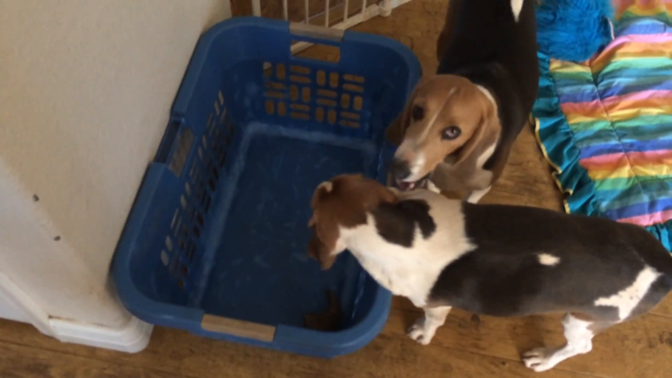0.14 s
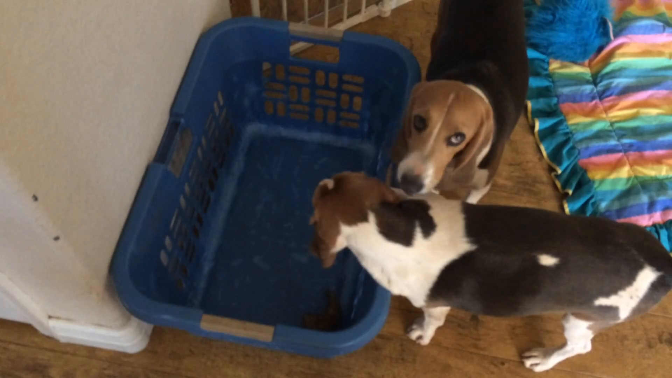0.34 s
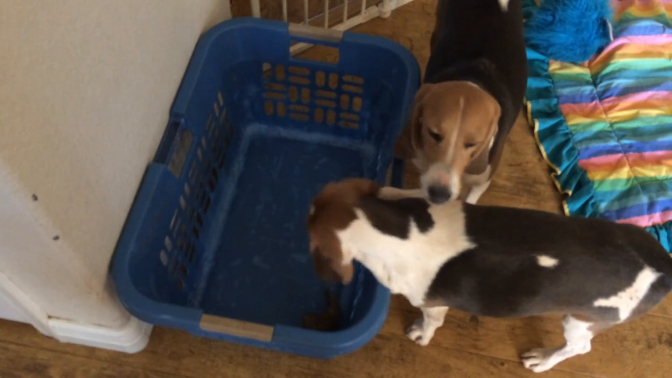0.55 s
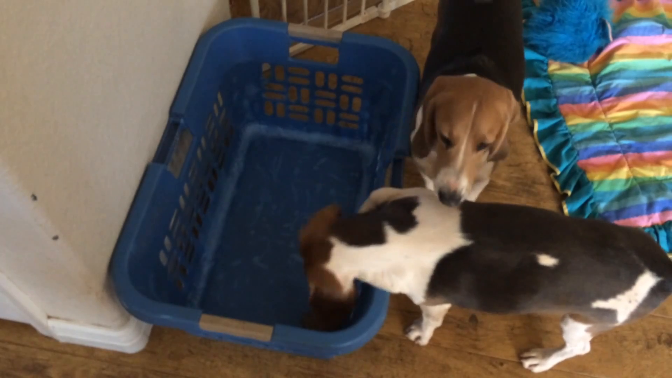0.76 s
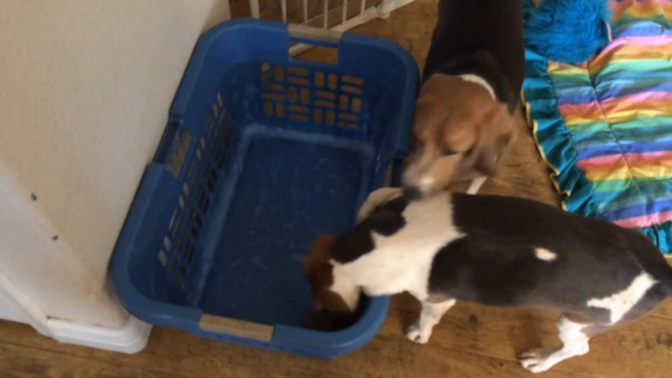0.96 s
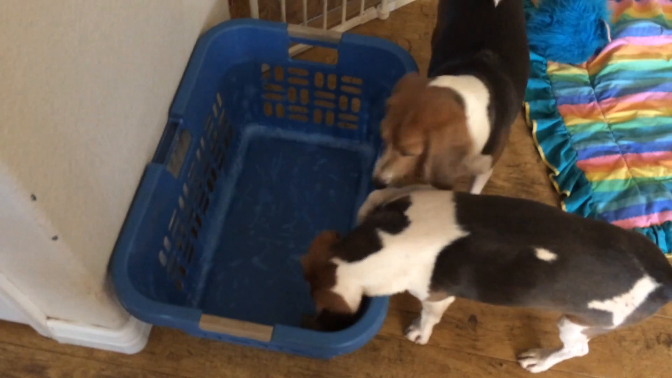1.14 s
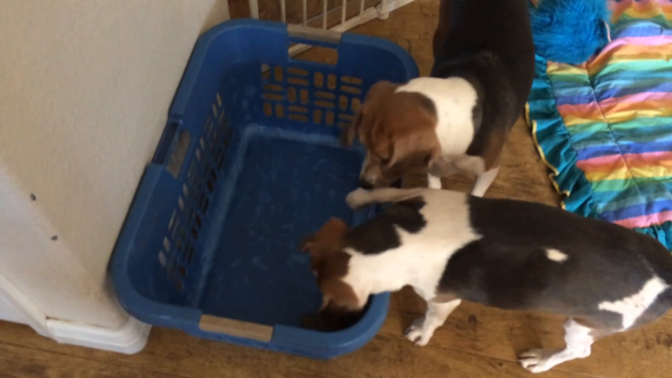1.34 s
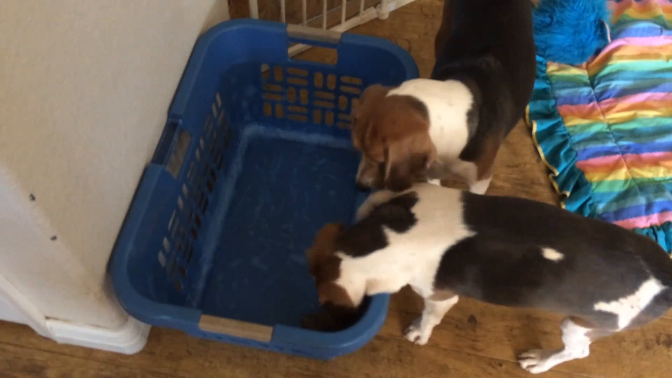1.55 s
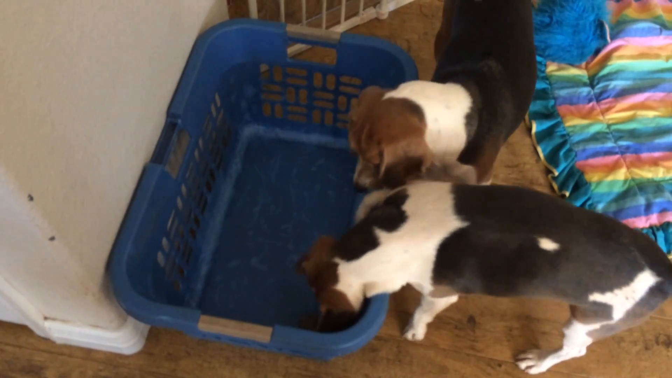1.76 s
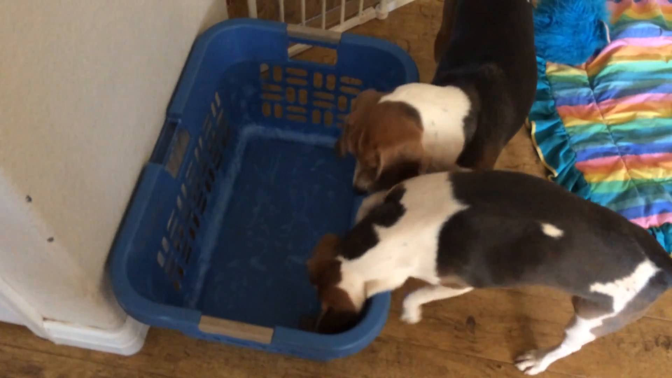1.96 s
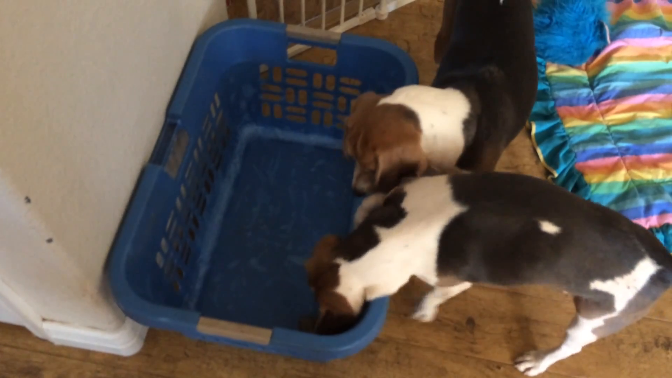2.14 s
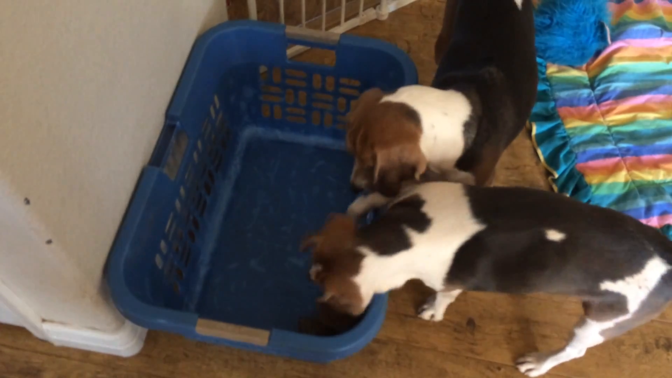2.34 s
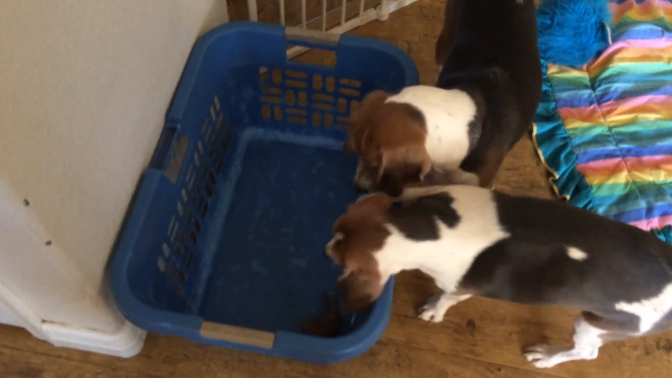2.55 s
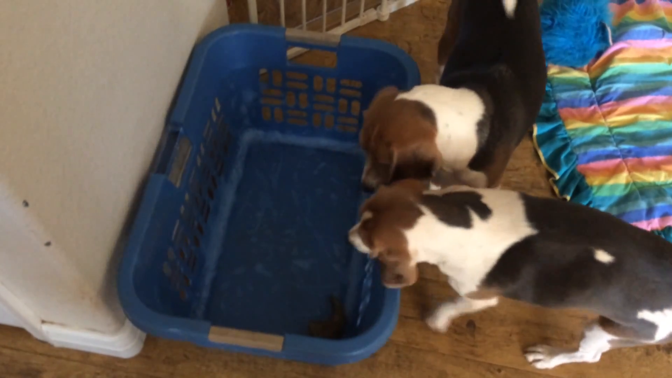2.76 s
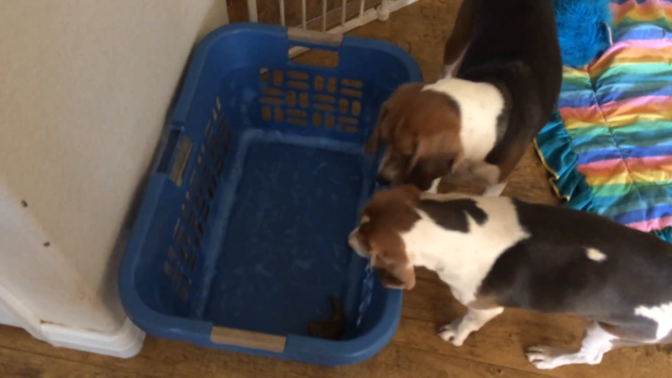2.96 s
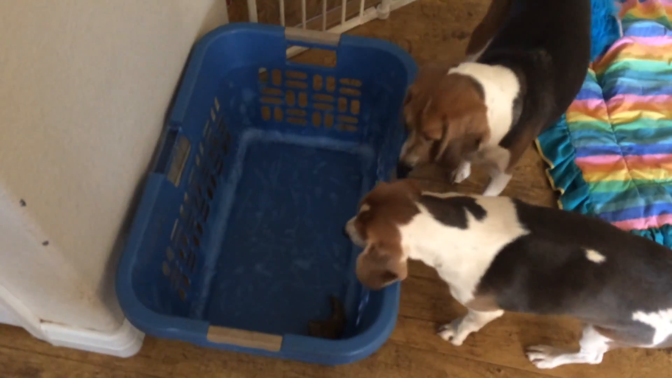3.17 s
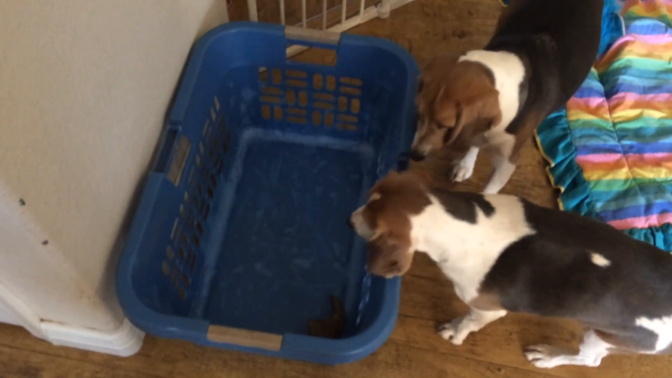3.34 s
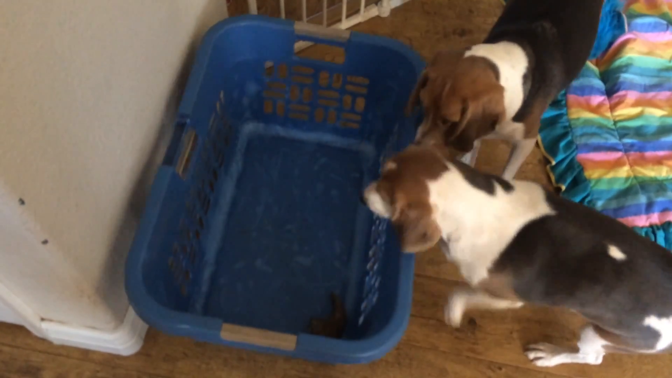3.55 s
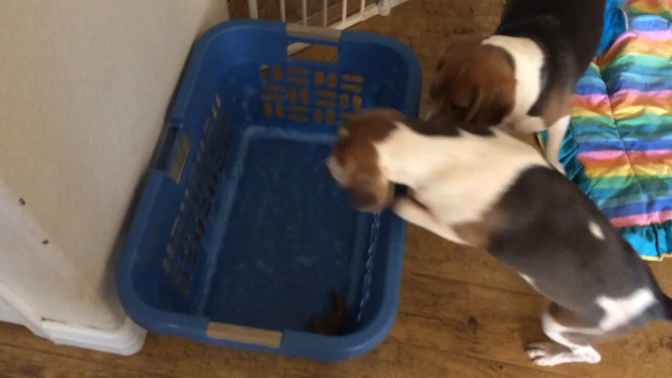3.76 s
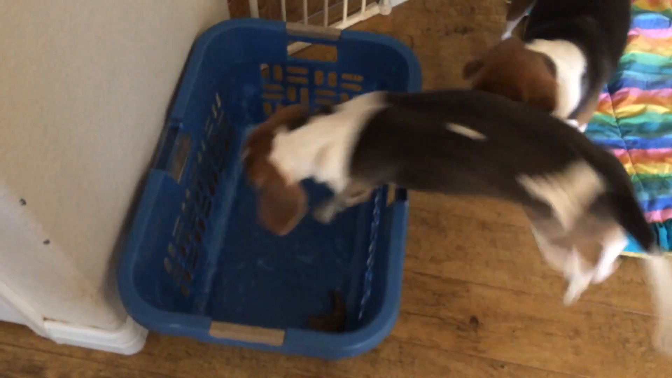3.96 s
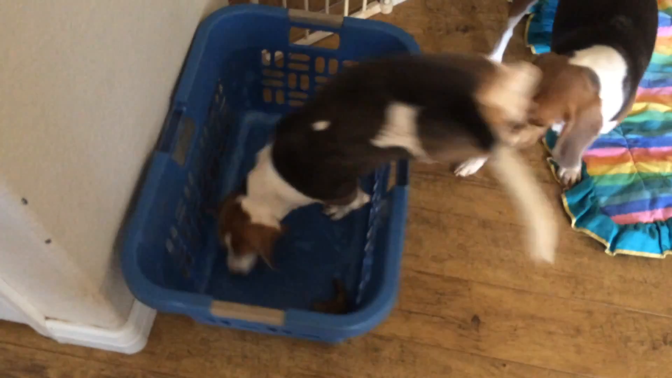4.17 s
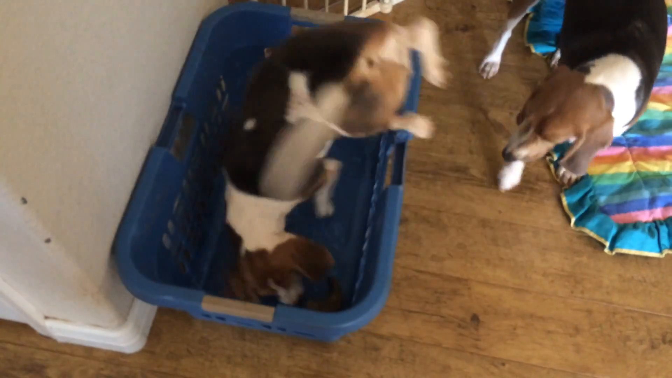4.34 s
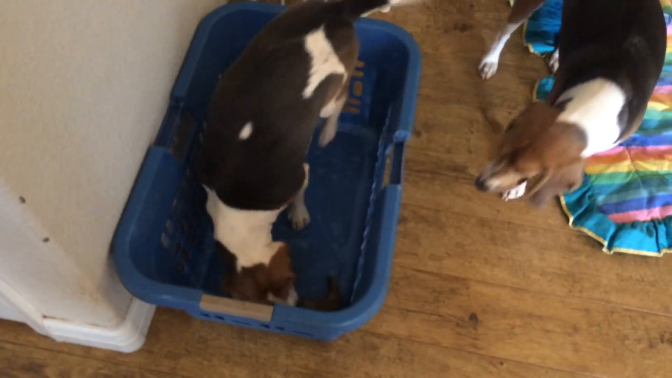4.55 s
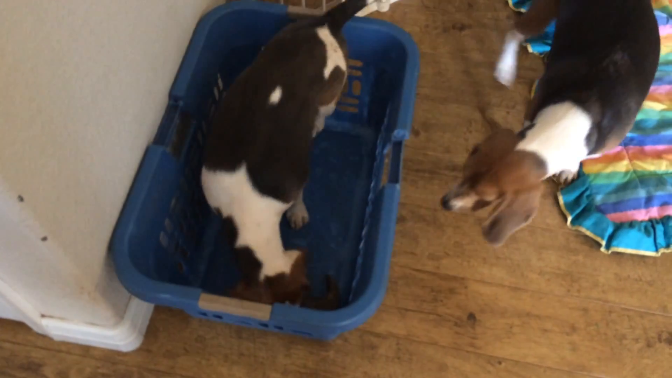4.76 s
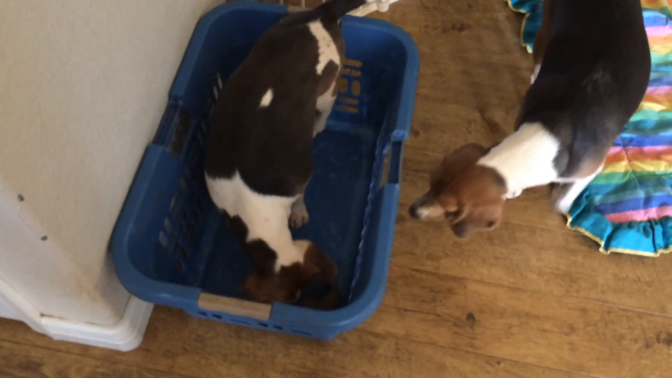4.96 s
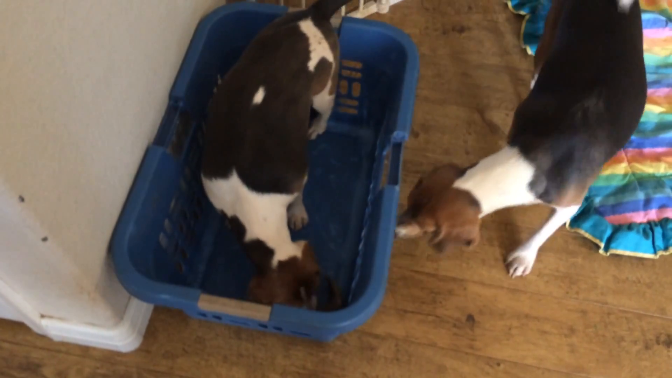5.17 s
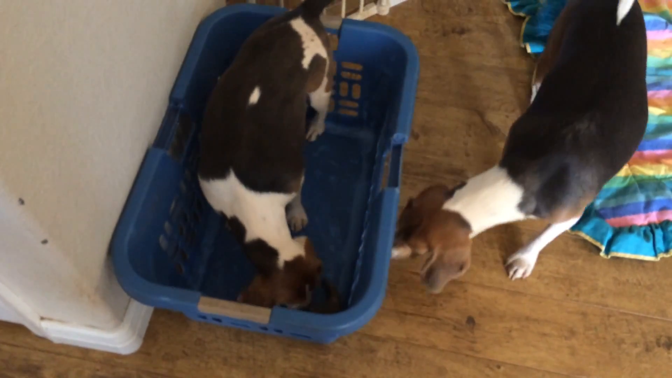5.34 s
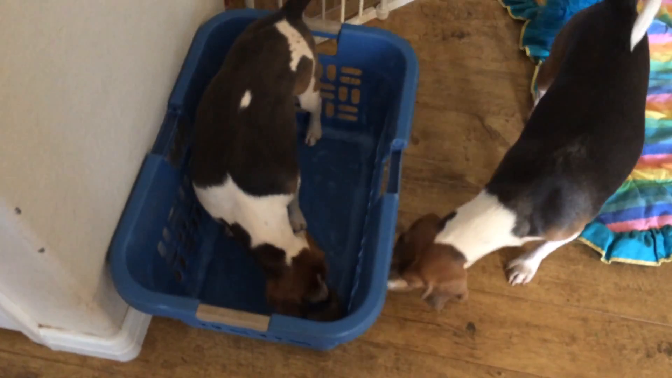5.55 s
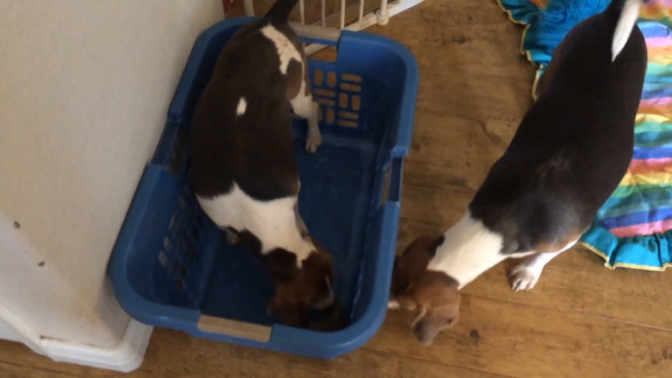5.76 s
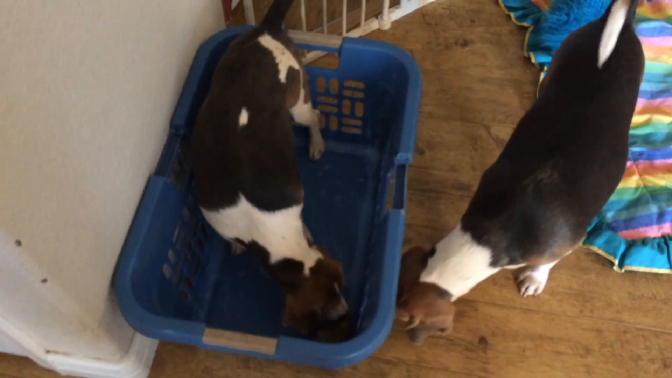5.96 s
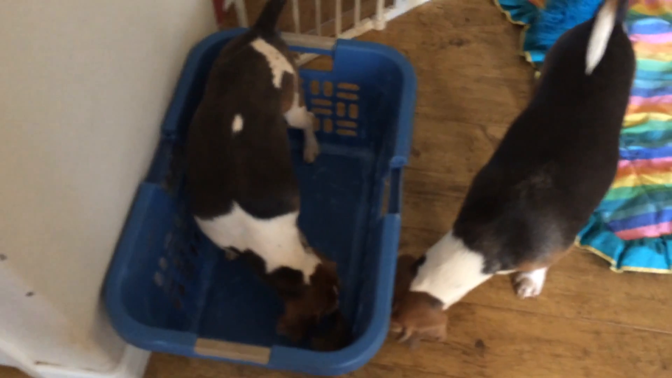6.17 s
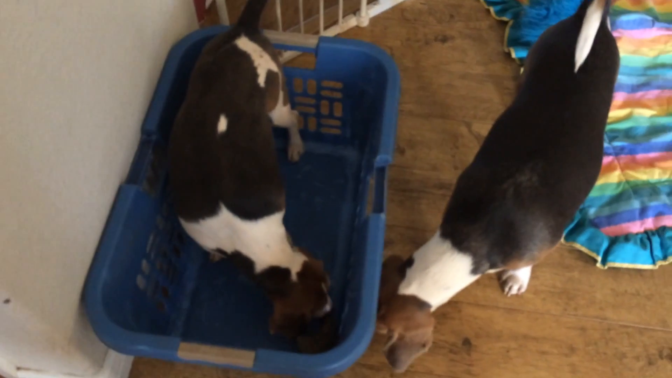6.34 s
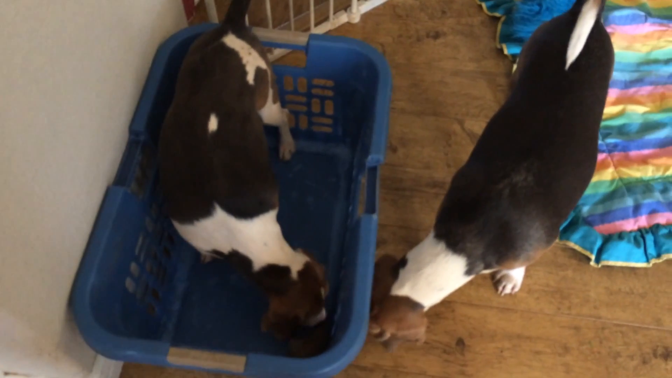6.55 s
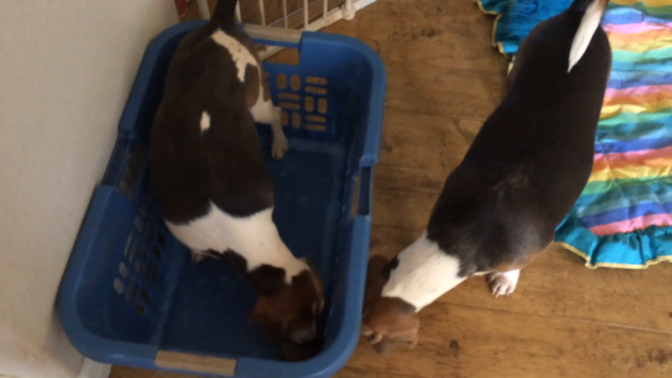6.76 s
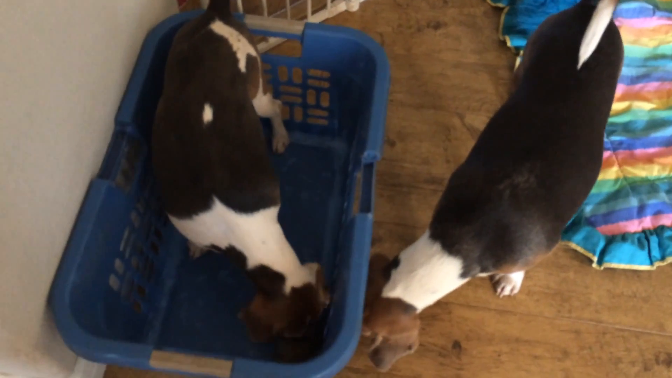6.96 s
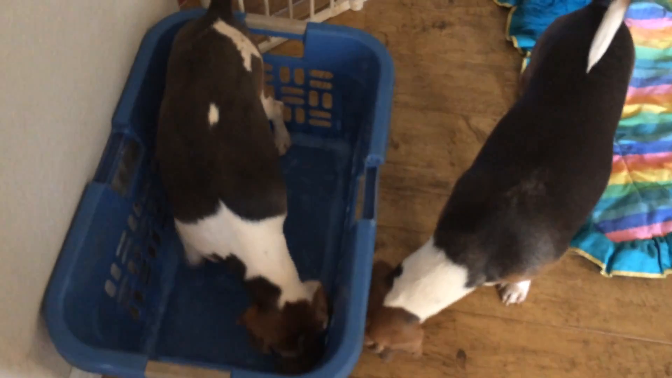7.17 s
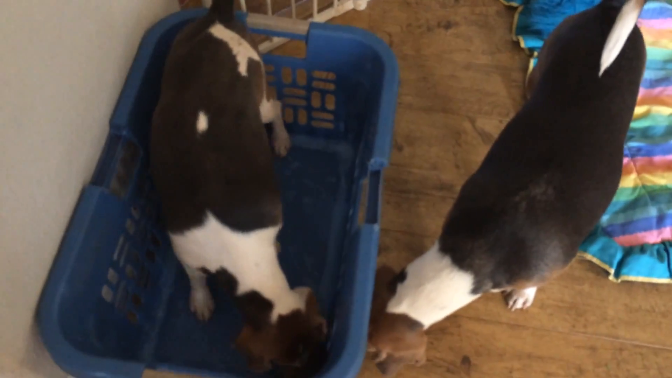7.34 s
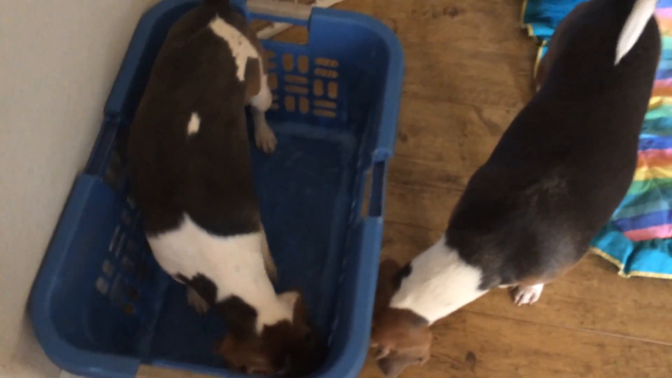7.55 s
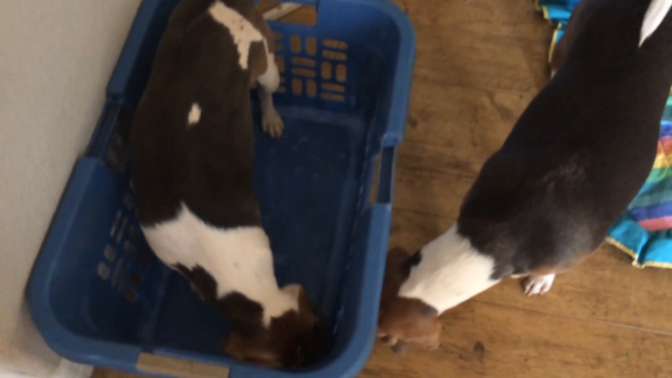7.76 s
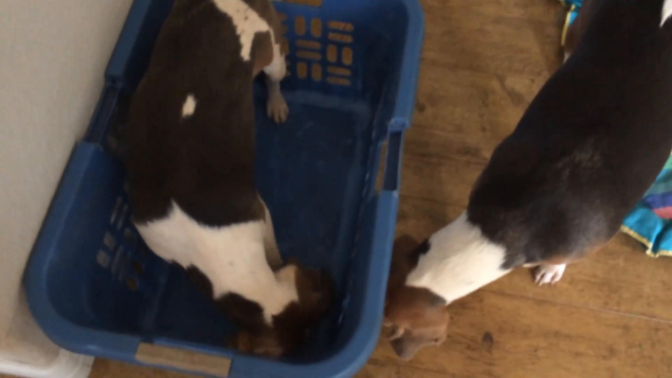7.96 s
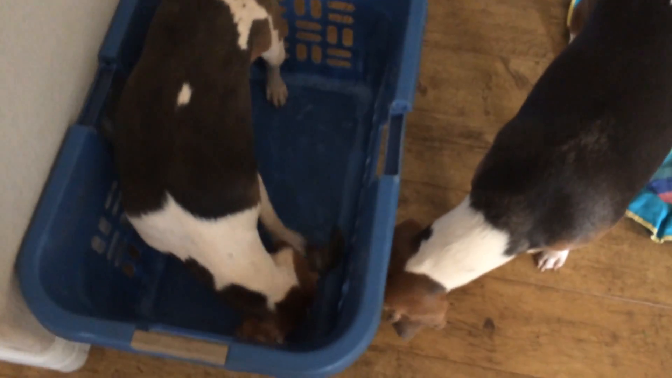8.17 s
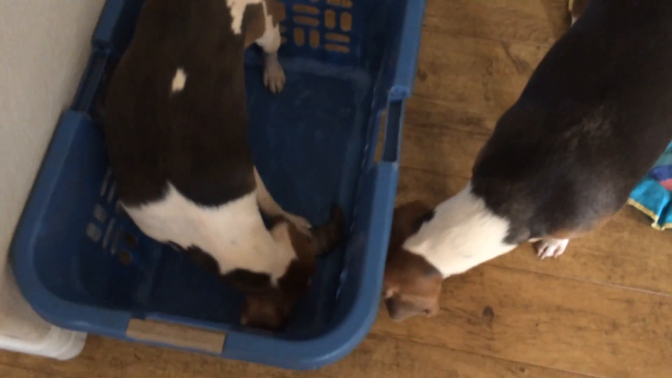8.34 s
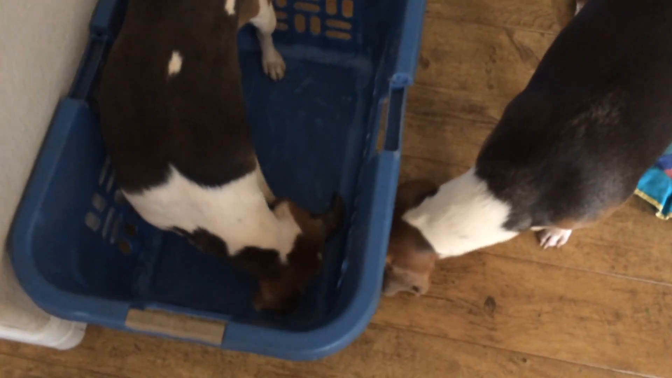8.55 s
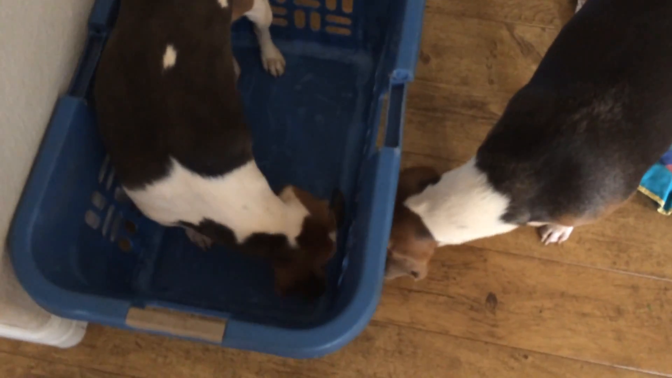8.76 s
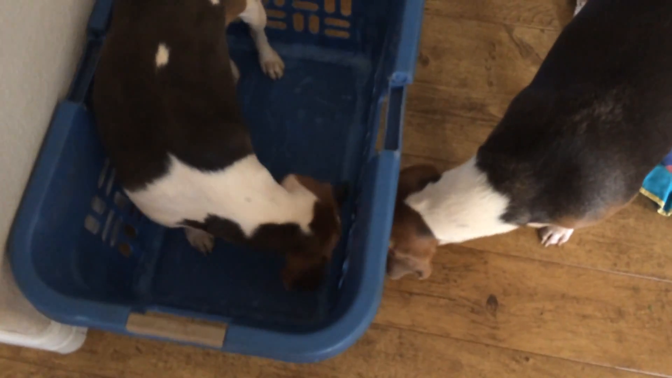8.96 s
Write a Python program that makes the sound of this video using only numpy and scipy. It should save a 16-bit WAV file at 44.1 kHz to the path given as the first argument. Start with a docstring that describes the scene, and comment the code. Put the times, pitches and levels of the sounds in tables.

```python
"""Two dogs nose about a hard plastic laundry basket on a wooden floor; one jumps in and digs.
Faint ticks, drags and narrow tones up to 2 s; ticks and soft brushing to 3.3 s; hard digging
3.8-4.5 s; thumps to 5.5 s, a lull, then lighter thumps, ticks and scrapes from 7.1 s to the end.
Struck or rubbed wall modes give knocks, thumps, rasp and rattle; filtered noise gives grit and hiss.
A small room answers; room tone and a nearby motor's hum run throughout."""
import sys
import numpy as np
from scipy import signal
from scipy.fft import rfft, irfft
from scipy.io import wavfile
from scipy.ndimage import uniform_filter1d

SR = 44100
rng = np.random.default_rng(int(sys.argv[2]) if len(sys.argv) > 2 else 0)


def inscribe(sig):
    """Save sig as 16-bit PCM at rate SR to the path in sys.argv[1].

    A 1-D sig is mono; a 2-D sig holds one channel per row.
    Samples are clipped to [-1, 1] before scaling.
    """
    pcm = np.round(np.clip(np.atleast_2d(sig).T, -1, 1) * 32767)
    wavfile.write(sys.argv[1], SR, pcm.astype(np.int16))


def invert_db(x):
    """Field ratio 10**(x/20) for x, a level in decibels (scalar or array-like)."""
    u = np.asarray(x, float) / 20
    return 10 ** u


N = 397341  # samples


def rms_one(x):
    """Scale to unit rms."""
    return x / np.sqrt(np.mean(x ** 2) + 1e-20)


def at_hz(points, hz):
    """Read a table on a log-frequency axis."""
    table_hz, values = np.array(points).T
    return np.interp(np.log(hz + 1), np.log(table_hz), values)


def coloured(x, spectrum):
    """Shape a signal by a relative spectrum in dB."""
    gain_db = at_hz(spectrum, np.fft.rfftfreq(len(x), 1 / SR))
    return irfft(rfft(x) * invert_db(gain_db), len(x))


def band(x, low_hz, high_hz):
    """Causal band-pass."""
    return signal.sosfilt(signal.butter(2, [low_hz, high_hz], "band", fs=SR, output="sos"), x)


def drift(rate_hz):
    """Slow random wander of unit rms, from smoothed random knots."""
    knots = np.arange(0, N + SR, SR / rate_hz)
    wander = np.interp(np.arange(N), knots, rng.standard_normal(len(knots)))
    return rms_one(uniform_filter1d(wander, int(SR / rate_hz)))


def add(out, start_s, sound):
    """Mix a sound in at a moment."""
    i = round(start_s * SR)
    out[i:i + len(sound)] += sound[:N - i]


# modes of the hollow tub and its walls: mode_hz [Hz], level_db [dB], t60_s [s, at damping 1]
BASKET_MODES = [(120, -2, 0.054), (161.5, 3, 0.13), (204.2, -1, 0.21), (290.7, -0.5, 0.11),
                (337.5, -1.5, 0.071), (363.6, -1, 0.15), (437.3, 2, 0.074), (598, -9.5, 0.05),
                (719, 0.5, 0.052), (860, 3, 0.052), (952, 5, 0.057), (1095, 6, 0.029), (1296, 4, .04),
                (1450, 3, 0.025), (1725, 4.5, 0.018), (2006, 4, 0.018), (2300, -2, 0.013),
                (2674, -2.5, 0.015), (3090, 1, 0.045), (3300, -2.5, 0.073)]


def struck(centre_hz, octaves, damping, contact_s, luck_db, turns):
    """Modes near the struck pitch swell during the push, then die; peak 1."""
    mode_hz, level_db, t60_s = np.transpose(BASKET_MODES)[:, :, None]
    t = np.arange(round(.3 * SR)) / SR
    near = np.exp(-.5 * (np.log2(mode_hz / centre_hz) / octaves) ** 2)
    fade_db = -60 * np.maximum(t - contact_s, 0) * damping / t60_s
    level = near * invert_db(level_db + luck_db[:, None] + fade_db)
    rings = level * np.cos(2 * np.pi * (mode_hz * (t - contact_s) + turns[:, None]))
    swell = np.sin(np.pi / 2 * np.minimum(t / contact_s, 1)) ** 2
    sound = rings.sum(axis=0) * swell
    return sound / np.abs(sound).max()


# claw ticks: start_s [s], crack_db [dB before envelope], knock_peak_db [dB], knock_hz [Hz],
# sizzle_db [dB before envelope]
CLAW_TICKS = [(0.0588, -62, -53, 2050, -62), (0.406, -71, -70, 900, -52), (0.54, -62.5, -46, 810, -79),
              (1.3, -61.5, -64, 1200, -74), (1.564, -69, -51, 1640, -72), (2.302, -38.5, -41, 2110, -24),
              (2.3169, -36, -45, 1280, -55), (2.342, -47, -32, 1000, -54), (2.355, -44.5, -33, 660, -37),
              (2.9738, -49.5, -49, 710, -65), (3.173, -74, -32.5, 900, -50), (3.1853, -61, -50, 1000, -33),
              (3.2879, -30.5, -39, 1230, -42), (3.3091, -31, -54, 2083, -33), (3.6466, -53, -58, 870, -72),
              (3.856, -39.5, -32, 1603, -40), (3.875, -26, -7.5, 935, -15.5), (3.921, -36, -20, 995, -24),
              (3.939, -25.5, -15.5, 759, -41), (3.9681, -21.5, -12, 1060, -29),
              (3.9764, -37, -21, 1496, -40), (4.146, -26, -25.5, 943.4, -15),
              (4.179, -22, -19.5, 2120, -21), (4.195, -31, -31, 1520, -35),
              (4.217, -30.5, -20.5, 1574, -39), (4.306, -26.5, -18, 960, -31), (4.348, -40, -20, 755, -45),
              (4.402, -21, -13.5, 1520, -18), (4.417, -46, -36, 1520, -41), (4.43, -13, -6, 877, -7),
              (4.444, -27.5, -25.5, 1212, -21.5), (4.484, -29.5, -21, 1190, -38.5),
              (4.786, -51, -33, 1286, -46), (4.7976, -29, -30, 1380, -23.5), (4.8287, -38, -31, 1360, -35),
              (5.242, -45, -37, 1206, -52), (5.245, -37.5, -22, 1030, -70), (5.4285, -35.5, -18, 950, -63),
              (5.4617, -32, -18.5, 977, -44), (5.4932, -46, -34.5, 867, -32),
              (5.597, -57, -64.5, 892, -51.5), (5.9979, -49, -52.5, 806, -49.5),
              (7.1455, -53, -46, 1464, -51), (7.2759, -52.5, -27.5, 806, -65),
              (7.442, -66, -42.5, 950, -65.5), (7.512, -54, -46, 980, -46), (7.556, -58, -47.5, 860, -70),
              (7.657, -46.5, -32.5, 1030, -63), (7.664, -51, -32, 1310, -65),
              (7.8533, -46.5, -28.5, 1115, -59.5), (7.9065, -62.5, -37, 875, -62),
              (7.963, -32, -30, 921, -49), (8.198, -46, -46, 1500, -32), (8.242, -47.5, -35.5, 2005, -53),
              (8.371, -63, -39.5, 896, -63), (8.8222, -60.5, -32, 970, -64)]


def claws():
    """Gritty crack of a few ms over a short wall knock; also plain clicks for the room tail."""
    out, far = np.zeros(N), np.zeros(N)
    t = np.arange(round(.05 * SR)) / SR
    crack_shape = (1 - np.exp(-t / 0.00035)) * (np.exp(-t / 0.004) + 0.88 * np.exp(-t / 0.00075))
    sizzle_shape = (1 - np.exp(-t / 0.0015)) * (np.exp(-t / 0.00093) + 0.18 * np.exp(-t / 0.005))
    impulse = 1.0 * (t == 0)
    for start_s, crack_db, knock_peak_db, knock_hz, sizzle_db in CLAW_TICKS:
        luck = rng.uniform(0.024, 1, len(BASKET_MODES))
        turns = rng.random(len(BASKET_MODES))
        grit = rng.standard_normal(len(t))
        knock = invert_db(knock_peak_db) * struck(knock_hz, 0.98, 1.3, .002, 22.0 * luck, turns)
        crack = invert_db(crack_db) * rms_one(band(grit, 2000, 7500)) * crack_shape
        sizzle = invert_db(sizzle_db) * rms_one(-band(grit, 7500, 15000)) * sizzle_shape
        # the wall bounces back once
        bounce = struck(knock_hz, 0.94, 2.2, 0.0015, -3.0 * luck, turns[::-1])
        bounce_delay_s = .006 + 0.0088 * turns[0]
        add(out, start_s, knock)
        add(out, start_s + bounce_delay_s, invert_db(-8.0) * bounce * np.abs(knock).max())
        add(out, start_s, crack + sizzle)
        # a plain band-passed click feeds the room tail
        sizes = invert_db(-4.0) * knock[:len(t)].std(), -crack.std(), invert_db(-3.5) * sizzle.std()
        bands_hz = [(knock_hz / 1.6, 2200), (2200, 7500), (7500, 15000)]
        for size, (low_hz, high_hz) in zip(sizes, bands_hz):
            add(far, start_s, rms_one(band(impulse, low_hz, high_hz)) * size)
    return out, far


# paw thumps: start_s [s], level_db [dB, peak of push and of ring before their shares], centre_hz [Hz]
PAW_THUMPS = [(2.338, -26, 190), (3.178, -34, 159), (3.872, -11, 359), (3.936, -9.5, 300),
              (3.966, -26, 306), (4.218, -33, 160.8), (4.345, -22.5, 200), (4.366, -21.5, 140),
              (4.425, -23, 400), (4.807, -33, 360), (4.834, -24, 159), (5.153, -36.5, 297),
              (5.184, -33, 458), (5.247, -24, 449), (5.254, -24, 179), (5.427, -29, 171),
              (5.459, -4.5, 345.5), (5.489, -12, 378), (6.008, -32.5, 335), (6.415, -35, 221),
              (7.224, -35, 170), (7.279, -20.5, 288.5), (7.851, -19, 361), (7.868, -35, 355),
              (7.906, -32, 440), (7.92, -33, 271), (7.943, -29, 296), (7.957, -27.5, 268), (8.78, -40, 250)]


def paws():
    """A soft push: a dull, heavily damped pulse plus a share of lingering tub ring."""
    share_at_200_hz, loss_per_octave = 0.67, 0.11  # higher thumps are drier
    out = np.zeros(N)
    for start_s, level_db, centre_hz in PAW_THUMPS:
        luck = rng.uniform(-1, 1, len(BASKET_MODES))
        turns = rng.uniform(-.1, .1, len(BASKET_MODES))
        share = np.clip(share_at_200_hz - loss_per_octave * np.log2(centre_hz / 200), 0, 1)
        contact_s = 2.2 / centre_hz
        push = struck(centre_hz, 1.0, 9.6, contact_s, 3.7 * luck, turns)
        ring = struck(centre_hz, 0.44, 1.1, contact_s, 1.5 * luck, turns)
        add(out, start_s, invert_db(level_db) * ((1 - share) * push + share * ring))
    return out


def slips(per_s, spread_db, clump_db):
    """Dense uneven stick-slip clicks, coming in clumps."""
    born = rng.random(N) < per_s / SR
    sizes = invert_db(spread_db * np.minimum(rng.exponential(1, N), 4)) * rng.choice([-1, 1], N)
    return born * sizes * invert_db(clump_db * drift(110)) + 1e-9


def through_basket(x, low_hz, high_hz, damping, wander_db):
    """A force drives the modes between two pitches, each wandering in level; rms 1."""
    out = np.zeros(N)
    for k, (mode_hz, level_db, t60_s) in enumerate(BASKET_MODES):
        if low_hz < mode_hz < high_hz:
            radius = invert_db(-60 * damping / (t60_s * SR))
            angle = 2 * np.pi * mode_hz / SR
            poles = [1, -2 * radius * np.cos(angle), radius * radius]
            ring = rms_one(signal.lfilter([1, 0, -1], poles, x))
            out += (-1) ** k * invert_db(level_db + wander_db * drift(45)) * ring
    return rms_one(out)


RISE_DB, SAG_DB_PER_S, RELEASE_DB_PER_S = 22, 25, 329
TUB_SAG_DB_PER_S, TUB_RELEASE_DB_PER_S = 23.5, 252


def pressure(full_s, rise_s, hold_s, sag_db_per_s, release_db_per_s):
    """Gain of one stroke: swell, tiring hold, release."""
    t = np.arange(N) / SR - full_s
    swell_db = RISE_DB * np.minimum(t, 0) / max(rise_s, .002)
    sag_db = sag_db_per_s * np.clip(t, 0, hold_s)
    release_db = release_db_per_s * np.maximum(t - hold_s, 0)
    return invert_db(swell_db - sag_db - release_db)


# pads and claws dragged over plastic: full_pressure_s [s], rise_s [s], hold_s [s],
# hiss_db [dB], wall_rasp_db [dB]
SCRAPE_STROKES = [(0.003, 0.01, 0.16, -83, -67), (0.755, 0.06, 0.1, -72, -67.5),
                  (1.43, 0.11, .02, -73.5, -67.5), (3.864, 0.0051, 0.0071, -50, -46),
                  (3.966, 0.014, 0.011, -52, -26), (4.129, 0.03, 0.05, -39.5, -41),
                  (4.145, 0.055, 0.13, -42, -35), (4.298, 0.02, 0.089, -47.5, -43),
                  (4.805, 0.049, 0.015, -57, -45), (5.17, 0.041, 0.052, -63, -56),
                  (6.417, 0.031, 0.034, -65, -59.5), (7.267, 0.061, 0.049, -61.5, -52),
                  (7.66, 0.11, 0.0095, -66, -50), (7.897, 0.011, 0.0077, -60, -67),
                  (7.946, 0.017, 0.073, -43, -39), (8.199, 0.052, .16, -46, -41.5),
                  (8.671, 0.076, 0.026, -61.5, -54), (8.984, 0.033, 0.039, -55.5, -48)]
# weight shifting on the tub floor: full_weight_s [s], rise_s [s], hold_s [s], rumble_db [dB]
WEIGHT_SHIFTS = [(2.822, .2, 0.17, -65.5), (3.175, 0.01, 0.013, -42.5), (3.875, 0.0055, 0.0093, -27),
                 (3.935, 0.02, 0.086, -33.5), (4.145, 0.038, 0.099, -34.5), (4.311, 0.045, 0.19, -34.5),
                 (4.806, 0.025, 0.024, -43.5), (5.157, 0.015, 0.17, -50.5), (7.277, 0.008, 0.03, -38),
                 (7.871, 0.023, 0.12, -44), (8.214, 0.055, .16, -50), (8.691, 0.042, 0.024, -59.5),
                 (8.958, 0.034, 0.031, -53)]
# scrape hiss spectrum: freq_hz [Hz], relative_db [dB]
HISS_SPECTRUM = [(900, -22.5), (2000, 1), (3200, 3.5), (4200, 3), (5100, 1), (6100, -0.5), (9000, -3),
                 (15100, -11.5), (15700, -35)]


def scrapes():
    """Rubbing is heard as surface hiss, as rasp of the walls and as rumble of the tub."""
    hiss_gain, rasp_gain, weight = np.zeros(N), np.zeros(N), np.zeros(N)
    for full_s, rise_s, hold_s, hiss_db, rasp_db in SCRAPE_STROKES:
        stroke = pressure(full_s, rise_s, hold_s, SAG_DB_PER_S, RELEASE_DB_PER_S)
        hiss_gain += stroke * invert_db(hiss_db)
        rasp_gain += stroke * invert_db(rasp_db)
    for full_s, rise_s, hold_s, rumble_db in WEIGHT_SHIFTS:
        stroke = pressure(full_s, rise_s, hold_s, TUB_SAG_DB_PER_S, TUB_RELEASE_DB_PER_S)
        weight += stroke * invert_db(rumble_db)
    force = slips(4000, 3.5, clump_db=3.0)
    fine_grit = slips(5000, 2.8, clump_db=1.5)
    # narrow bands of the hiss wander randomly in level
    edges_hz = np.geomspace(1200, 16000, 19)
    wandering = np.zeros(N)
    for k, (low_hz, high_hz) in enumerate(zip(edges_hz, edges_hz[1:])):
        wandering += (-1) ** k * invert_db(2.0 * drift(60)) * band(fine_grit, low_hz, high_hz)
    hiss = rms_one(coloured(wandering, HISS_SPECTRUM))
    rasp = through_basket(slips(9000, 2.5, clump_db=1.53), 650, 2600, 2.9, wander_db=3.0)
    rumble = through_basket(force, 110, 650, 0.88, wander_db=3.5)
    return hiss_gain * hiss + rasp_gain * rasp + weight * rumble


# rattling tails after some ticks and thumps: start_s [s], rattle_db [dB, of the wall modes]
RATTLE_TAILS = [(2.346, -56), (3.176, -75), (3.29, -54.5), (3.88, -39.5), (3.969, -40.5), (4.433, -27.5),
                (5.248, -56), (5.428, -54)]


def rattles():
    """Dying tails of varied strength: dense clicks through the upper modes, plus a little grit."""
    decay_db_per_s = 113.5
    dying = sum(pressure(start_s, .002, 0, 0, decay_db_per_s) * invert_db(rattle_db)
                for start_s, rattle_db in RATTLE_TAILS)
    chatter = slips(6000, 2.8, clump_db=1.0)
    walls = through_basket(chatter, 650, 3600, 0.77, wander_db=4.5)
    mid_grit = invert_db(-6.5) * rms_one(band(chatter, 2500, 3600))
    high_grit = invert_db(-10.5) * rms_one(band(chatter, 5000, 8900))
    return dying * (walls + mid_grit + high_grit)


# fur and nose brushing along the plastic: full_pressure_s [s], rise_s [s], hold_s [s], level_db [dB],
# tilt_db [dB per octave above 1 kHz], mirror_share [share mirrored by the wall]
BRUSH_STROKES = [(2.623, 0.2, 0.015, -59.5, -4, 0.1), (2.698, 0.094, 0.018, -60, -5.5, 0.1),
                 (2.812, 0.11, 0.092, -55, -4, 0.058), (3.137, 0.19, .14, -66, -2.5, 0.1),
                 (5.082, 0.32, 0.043, -63, -2.5, 0.099), (7.599, 0.066, 0.096, -54.5, -4.5, 0.5)]


def brushes():
    """Soft fine-grained rustle; close to the wall its mirror image combs the hiss."""
    mirror_delay_s = 0.0005
    rustle = band(slips(12000, 3.6, clump_db=0.4), 750, 17000)
    duller = uniform_filter1d(rustle, size=2)
    mirrored = np.interp(np.arange(N) - mirror_delay_s * SR, np.arange(N), duller)
    out = np.zeros(N)
    for full_s, rise_s, hold_s, level_db, tilt_db, mirror_share in BRUSH_STROKES:
        i, j = round((full_s - 0.5) * SR), round((full_s + 0.5) * SR)
        combed = (rustle + mirror_share * mirrored)[i:j]
        sound = rms_one(coloured(combed, [(1000, 0), (16000, 4 * tilt_db)]))
        stroke = pressure(full_s, rise_s, hold_s, SAG_DB_PER_S, RELEASE_DB_PER_S)[i:j]
        out[i:j] += invert_db(level_db) * sound * stroke
    return out


# squeaks, short wall rings and knocks: start_s [s], length_s [s], pitch_hz [Hz],
# level_db [dB before envelope]
NARROW_TONES = [(0.05, 0.027, 2060, -55.5), (0.331, 0.079, 854, -63), (0.337, 0.07, 2060, -67),
                (0.528, 0.098, 800, -59), (2.251, 0.027, 3900, -66.5), (2.673, 0.054, 3400, -64),
                (2.924, 0.022, 3630, -63), (5.425, 0.097, 943, -37), (6.392, 0.053, 906, -53),
                (6.43, 0.038, 901, -48.5), (6.52, 0.088, 4140, -70), (7.592, 0.055, 1720, -54.5),
                (7.581, 0.086, 5960, -58.5), (8.172, 0.027, 910, -38)]


def narrow_tones():
    """Squeaks, short wall rings and knocks: narrow-band noise that swells and fades."""
    half_width = 0.051  # share of pitch
    out = np.zeros(N)
    for start_s, length_s, pitch_hz, level_db in NARROW_TONES:
        noise = rng.standard_normal(round(length_s * SR))
        tone = band(noise, (1 - half_width) * pitch_hz, (1 + half_width) * pitch_hz)
        add(out, start_s, invert_db(level_db) * rms_one(tone) * np.hanning(len(tone)))
    return out


# room decay: freq_hz [Hz], t60_s [s]
ROOM_DECAY = [(150, 0.45), (400, 0.42), (1000, 0.57), (3000, 0.42), (7000, 0.19), (14000, 0.32)]


def room(x):
    """A diffuse tail of octave-band noise, each band with its own decay."""
    gap_s = 0.00046
    t = np.arange(round(.7 * SR)) / SR
    tail = np.zeros(len(t))
    for low_hz in 90 * 2 ** np.arange(0, 8.):
        noise = band(rng.standard_normal(len(t)), low_hz, min(2 * low_hz, 17000))
        tail += noise * invert_db(-60 * t / at_hz(ROOM_DECAY, 1.3 * low_hz))
    tail = tail * np.clip(t / gap_s - 1, 0, 1)
    return signal.fftconvolve(x, tail / np.sqrt(np.sum(tail ** 2)))[:N]


# room tone spectrum: freq_hz [Hz], relative_db [dB]
AIR_SPECTRUM = [(44, -33.5), (75, 4), (86, -17.5), (107, -7), (172, -6.5), (264, -15.5), (295, -16.5),
                (723, -25), (828, -25), (885, -25.5), (1860, -35), (15200, -48), (15700, -74.5)]
# motor hum partials: partial_hz [Hz], level_db [dB rms before wavering], waver_db [dB rms]
HUM_PARTIALS = [(57.5, -56, 1), (116.4, -62, 2), (177.2, -64, -2.5), (232, -72, 4.5)]


def background():
    """Room tone of shaped noise, and a motor hum whose partials waver in level and pitch."""
    air_db = -64  # rms over 310-16000 Hz
    air = coloured(rng.standard_normal(N), AIR_SPECTRUM)
    air = invert_db(air_db + 0.5 * drift(4.3)) * air / band(air, 310, 16000).std()
    warped_s = np.cumsum(1 + 0.0018 * drift(2.1)) / SR
    hum = np.zeros(N)
    for partial_hz, level_db, waver_db in HUM_PARTIALS:
        tone = np.sqrt(2) * np.sin(2 * np.pi * partial_hz * warped_s)
        hum += invert_db(level_db + waver_db * drift(15)) * tone
    return air + hum


def scene():
    """Basket sounds, room tail and background; drawn-out sounds feed the room less than ticks do."""
    ticks, far_ticks = claws()
    thumps = paws()
    drawn_out = scrapes() + brushes() + narrow_tones() + rattles()
    tail = room(invert_db(-9) * far_ticks + invert_db(-9.5) * thumps + invert_db(-15.5) * drawn_out)
    # steep treble limit; ticks and thumps stay unfiltered here
    low_pass = signal.cheby2(12, 45, 15600, fs=SR, output="sos")
    soft = signal.sosfilt(low_pass, drawn_out + tail + background())
    return (ticks + thumps + soft)[None]


def top_cut(x):
    """Nothing passes above the cut-off."""
    return signal.sosfilt(signal.butter(12, 17110, fs=SR, output="sos"), x)


def record(dry):
    """Rounds the tallest peaks and low-passes near 15.8 kHz."""
    rounded = 1.15 * np.tanh(dry / 1.15)
    low_pass = signal.butter(10, 15800, fs=SR, output="sos")
    mix = signal.sosfilt(low_pass, rounded)
    return top_cut(mix)


dry = scene()
out = record(dry)
inscribe(out)
```